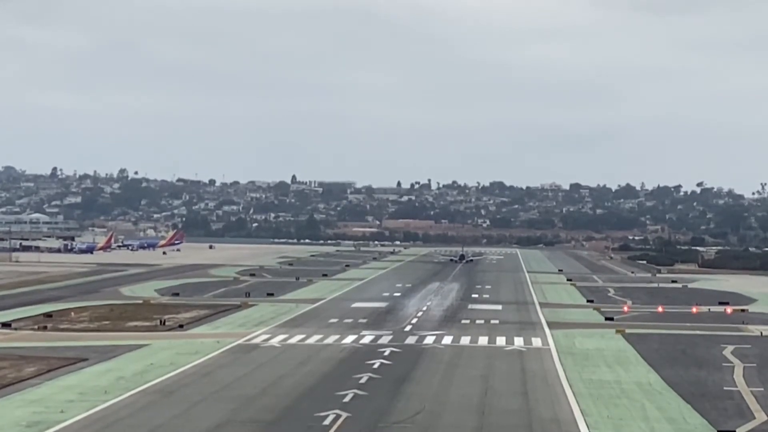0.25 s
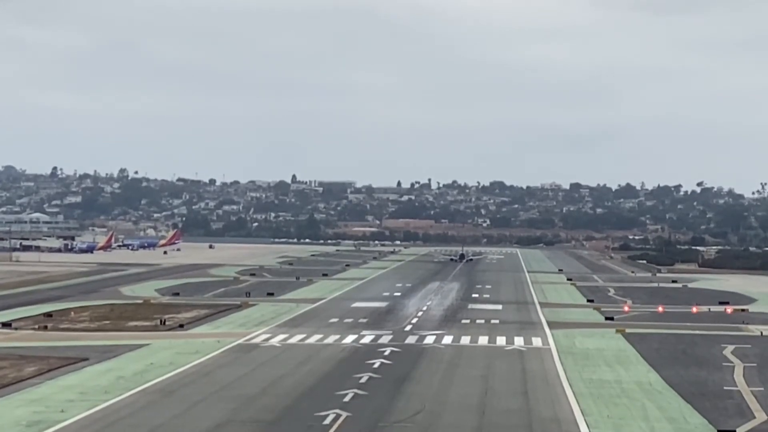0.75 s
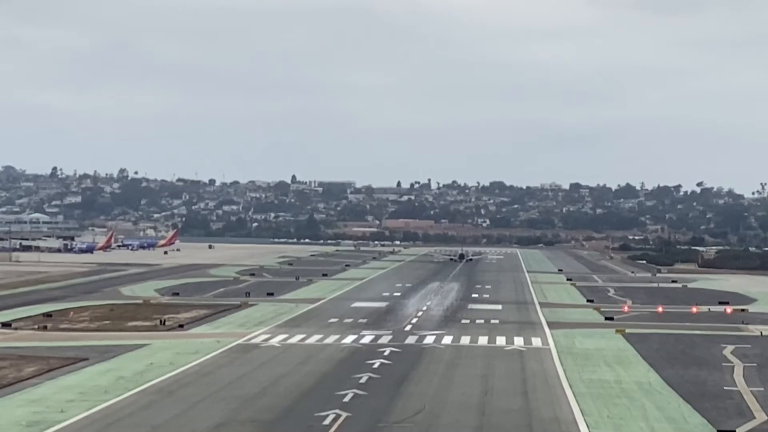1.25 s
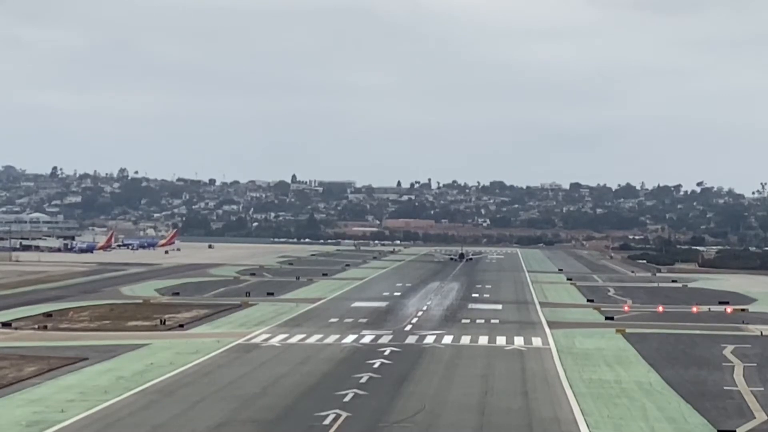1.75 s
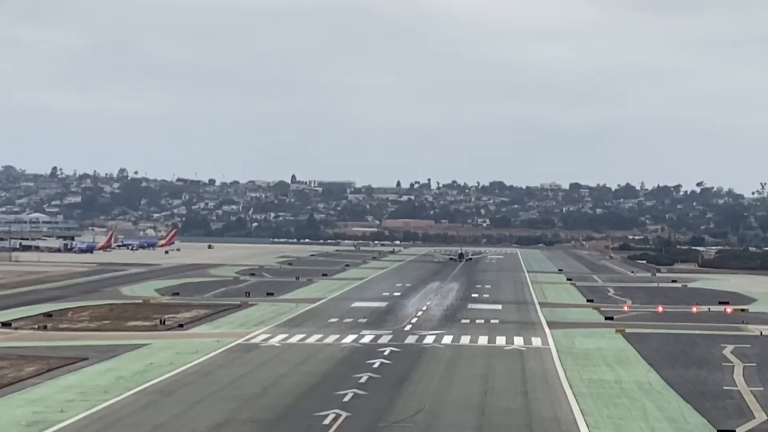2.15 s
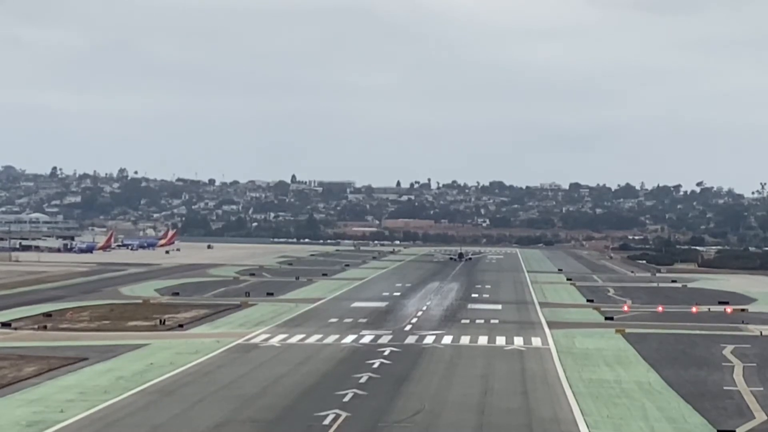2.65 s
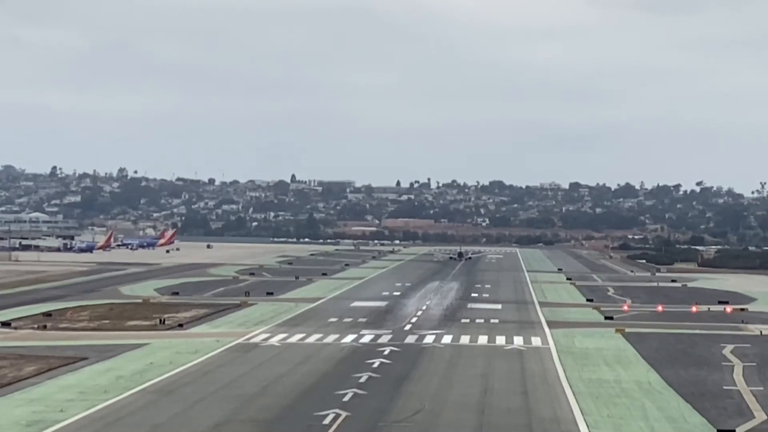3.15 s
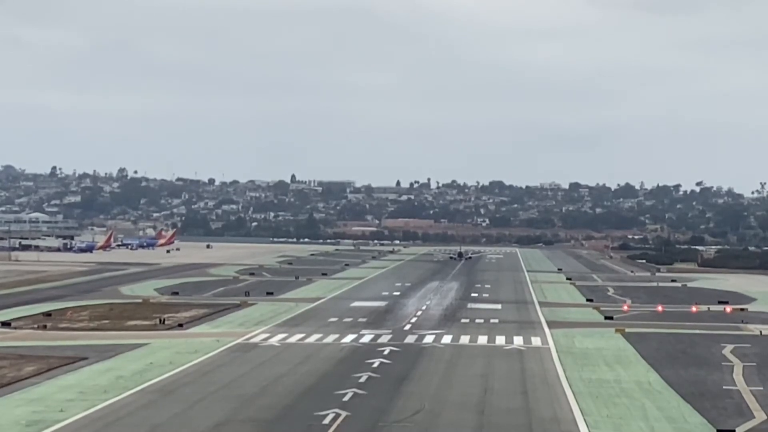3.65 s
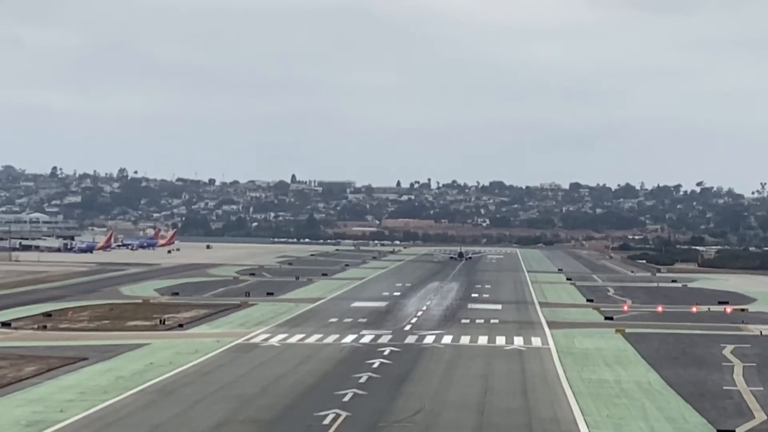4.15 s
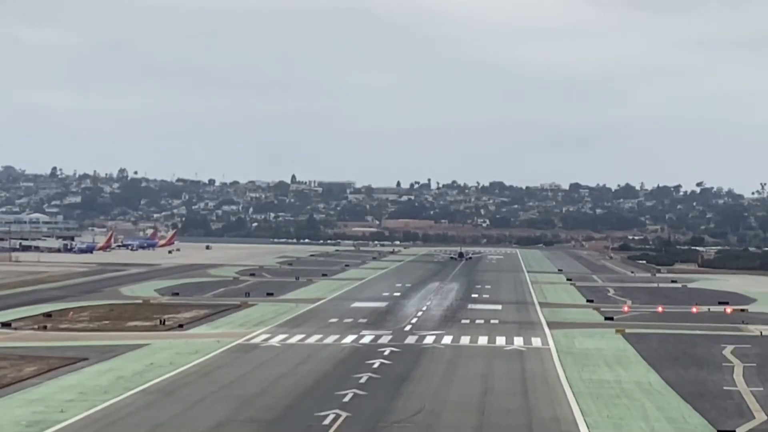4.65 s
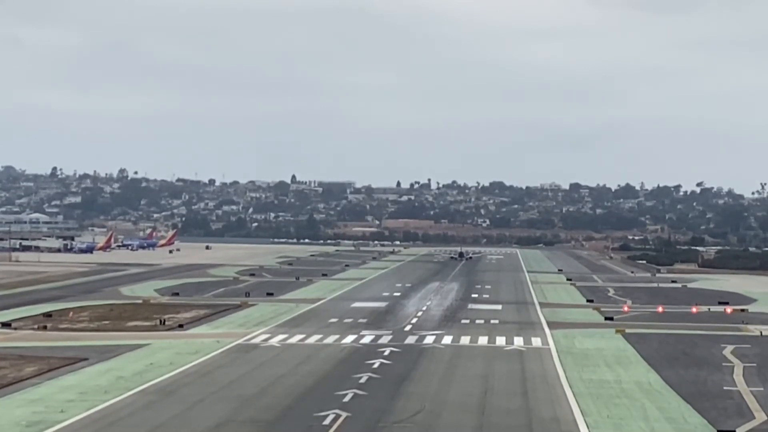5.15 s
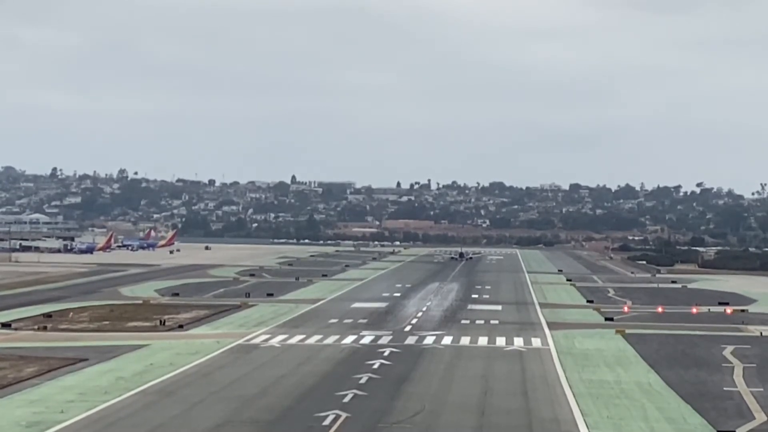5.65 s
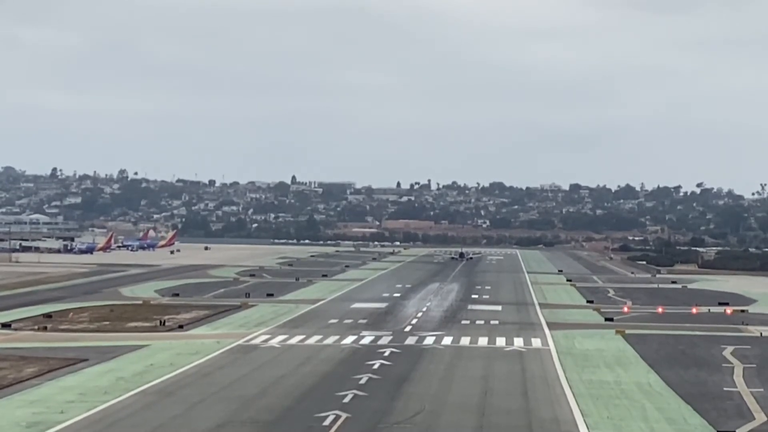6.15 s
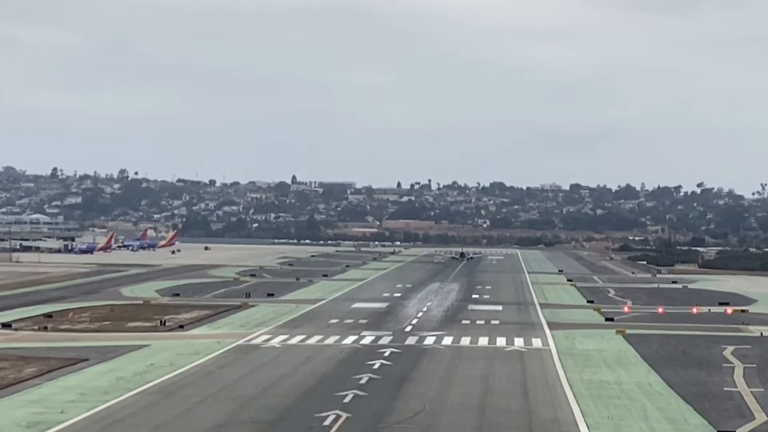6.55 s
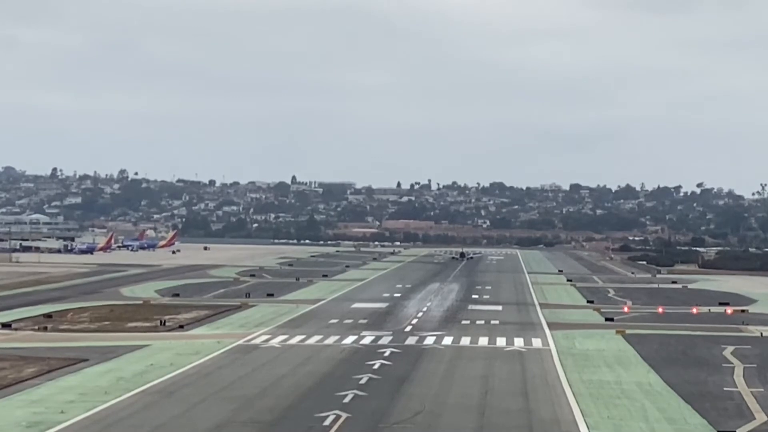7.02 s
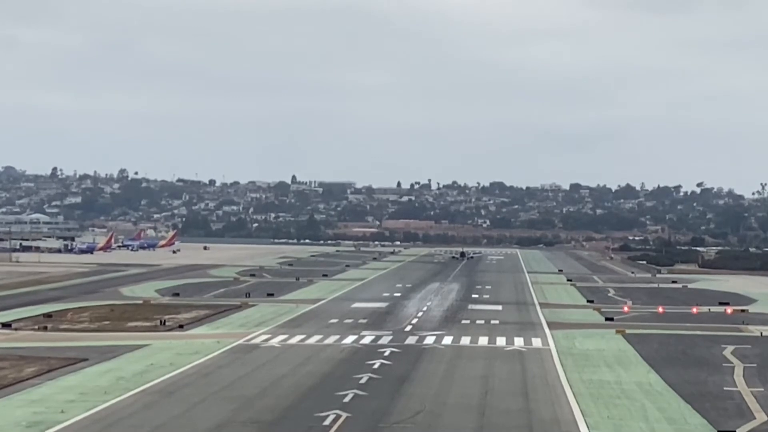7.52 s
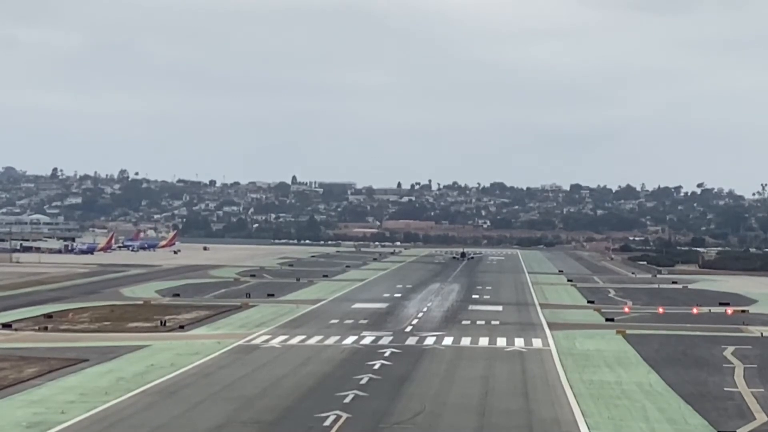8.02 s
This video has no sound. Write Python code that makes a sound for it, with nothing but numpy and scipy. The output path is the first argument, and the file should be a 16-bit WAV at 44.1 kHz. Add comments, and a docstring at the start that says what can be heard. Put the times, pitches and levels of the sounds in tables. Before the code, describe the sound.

A close-spaced stereo microphone in open air picks up far jet rumble and soft hiss. A deep engine drone slides downward, with a knock and light taps close by, then climbs under throttle into a raspy growl. Just past the middle the vehicle whooshes by, its note falling abruptly, and a smoother, wavering drone recedes with soft air hiss and a few handling bumps.

```python
"""Outdoors by a runway, the rumble of distant jets rises and falls under a steady wash of open air.
A few dull thumps and ticks sound close to the microphone while a piston engine (by its beat a V8) coasts down.
It revs up with a hard rasp, sweeps past with a rush of air, drops in pitch and drones away; more thumps follow.
The engine is a sum of orders of its cycle rate plus exhaust bursts; air and jets are coloured noise,
the thumps decaying sines, the ticks tiny bursts of noise."""
import sys
import numpy as np
from scipy import signal
from scipy.fft import rfft, irfft
from scipy.io import wavfile

SR = 44100
rng = np.random.default_rng(int(sys.argv[2]) if len(sys.argv) > 2 else 0)


def inscribe(sig):
    """Save sig as 16-bit PCM at rate SR to the path in sys.argv[1].

    A 1-D sig is mono; a 2-D sig holds one channel per row.
    Samples are clipped to [-1, 1] before scaling.
    """
    pcm = np.round(np.clip(np.atleast_2d(sig).T, -1, 1) * 32767)
    wavfile.write(sys.argv[1], SR, pcm.astype(np.int16))


N = 365130
TIME = np.arange(N) / SR

# How hard the engine works. Each row: time in seconds, throttle 0-1.
THROTTLE = [(0, 0.35), (2.3, 0), (2.58, 0.8), (3.4, 0.99), (4.0, 0.73), (4.18, 0.54), (4.36, 0.91),
            (4.52, 0.65), (4.72, 0.58), (5.45, 0.58), (6.1, 0.52), (8.28, 0.3)]


def gain_of(db):
    """Decibels to amplitude."""
    return 10 ** (np.asarray(db) / 20)


def evened(x):
    """Scales to rms 1."""
    return x / np.sqrt(np.mean(abs(x) ** 2) + 1e-20)


def curves(rows):
    """Each column of a time table, at every sample."""
    s, *columns = np.transpose(rows)
    return [np.interp(TIME, s, column) for column in columns]


def read(points, hz):
    """A spectrum table on a log-frequency axis."""
    f, value = np.transpose(points)
    return np.interp(np.log(hz + 1), np.log(f + 1), value)


def coloured(x, spectrum):
    """Gives x a spectrum, at rms 1."""
    gain = gain_of(read(spectrum, np.fft.rfftfreq(N, 1 / SR)))
    return evened(irfft(rfft(x) * gain, N))


def wander(rate):
    """Smooth chance of about rms 1, changing about rate times a second."""
    points = 4096
    hz = np.fft.rfftfreq(points, TIME[-1] / points)
    slow = irfft(rfft(rng.standard_normal(points)) / (1 + (hz / rate) ** 4))
    return evened(np.interp(TIME, np.linspace(0, TIME[-1], len(slow)), slow))


def noise(spectrum):
    """Coloured noise at two closely spaced microphones; its top treble reaches the left one late."""
    # Each row: frequency in Hz, left-right likeness 0-1.
    likeness = [(30, 0.72), (70, 0.89), (150, 0.85), (300, 0.91), (550, 0.84), (1000, 0.48), (1700, 0.7),
                (2300, 1), (7000, 1), (8500, 0.79), (15000, 0.66)]
    lag_s, lag_from_hz = 0.000295, 7600
    hz = np.fft.rfftfreq(N, 1 / SR)
    same = np.clip(read(likeness, hz), -1, 1)
    mid, side = rfft(rng.standard_normal((2, N))) * np.sqrt([1 + same, 1 - same])
    late = np.exp(-2j * np.pi * hz * lag_s * (hz > lag_from_hz))
    return coloured(irfft([(mid + side) * late, mid - side], N), spectrum)


def nearness(half_s):
    """1 at the closest moment, falling towards 0 before and after; half as much half_s seconds away."""
    closest_s = 5.18
    return 1 / (1 + ((TIME - closest_s) / half_s) ** 2)


def leaving():
    """0 until the engine has gone by and its tail turns to the listener, then rising towards 1."""
    leave_s, takes_hold_s = 5.66, 0.45
    return 1 - np.exp(-np.maximum(TIME - leave_s, 0) / takes_hold_s)


def driven(coast_db, throttle_db, pass_db, leave_db):
    """A layer's level in dB, from the throttle and the way past."""
    throttle, = curves(THROTTLE)
    return coast_db + throttle_db * throttle + pass_db * nearness(half_s=0.2) + leave_db * leaving()


def swell(s, half_s, db):
    """A smooth rise and fall of amplitude around one moment."""
    return gain_of(db) * np.exp(-.5 * ((TIME - s) / half_s) ** 2)


def together(*gains):
    """Amplitude of unrelated noises sounding at once."""
    return np.sqrt(sum(g ** 2 for g in gains))


def partial(turns, scatter, rate, spread):
    """A tone plus its scattered reflections, which fade in and out and differ a little between the ears."""
    common = 1 + scatter * (wander(rate) + 1j * wander(rate))
    apart = spread * (wander(rate) + 1j * wander(rate))
    spin = np.exp(2j * np.pi * (turns + rng.random()))
    return evened((np.array([common + apart, common - apart]) * spin).real)


def drone(turns, speed, trim_db=-0.73, note_trim_db=-0.6, fading_db=-0.5, far_fading_db=5.0, fading_rate=4.4):
    """The deep, clean orders of the exhaust and its main note; they fade in and out more as the engine leaves."""
    # Loudness of the deep orders. Each row: time in seconds, level in dB before the trim.
    drone_level = [(0.0, -33), (0.28, -20), (0.64, -26), (2.03, -18), (2.4, -29), (2.53, -17),
                   (3.23, -17.5), (4.01, -20), (4.12, -27.5), (4.43, -18.5), (4.56, -39), (4.72, -21),
                   (5.14, -16.5), (5.35, -20), (5.48, -24.5), (5.67, -17.5), (6.79, -28.5), (7.76, -23.5),
                   (8.28, -17.5)]
    # Each row: multiple of the cycle rate, relative level in dB, dB added at the pass, dB added once it leaves.
    drone_orders = [(1, -1.5, 4, -15), (2, 3, -6, -0.8), (3, -5, 10, -14), (8, -0.66, 3, -17)]
    # The exhaust's response, which those orders glide through. Each row: frequency in Hz, gain in dB.
    exhaust = [(33.0, -35.5), (50.0, -11), (70.0, -16.5), (90.0, -5.5), (115.0, -0.5), (140.0, 2),
               (175.0, -3.5), (270.0, -31), (320.0, -9.5), (370.0, -8), (400.0, -11.5), (470.0, -19)]
    # The main note. Each row: time in seconds, level in dB before the trim.
    note_level = [(0, -26.5), (.58, -32.5), (1.03, -21.5), (1.9, -24), (2.2, -23), (2.63, -16.5),
                  (4.0, -19.5), (4.27, -31.5), (4.55, -24), (4.8, -33.5), (5.35, -33), (5.5, -21),
                  (6.0, -27.5), (6.8, -31.5), (8.28, -47)]
    note_order = 5
    level_db = curves(drone_level)[0] + trim_db
    levels = [(note_order, curves(note_level)[0] + note_trim_db)]
    for k, db, pass_db, leave_db in drone_orders:
        order = round(k)
        response_db = read(exhaust, order * speed)
        levels.append((order, level_db + driven(db, 0, pass_db, leave_db) + response_db))
    depth_db = fading_db + far_fading_db * leaving()
    out = 0
    for order, db in levels:
        tone = partial(order * turns, scatter=0.26, rate=19.0, spread=0.039)
        out = out + gain_of(db + depth_db * wander(fading_rate)) * tone
    return out


def overtones(turns, speed, trim_db=-6.5, scatter_low=0.17, scatter_per_order=0.022):
    """Weaker orders swell as they glide through the pipe's resonances; the high ones are rougher and need throttle."""
    # Each row: multiple of the cycle rate, relative level in dB.
    orders = [(4, -2.5), (6, 0.5), (7, -1), (9, -5.5), (10, -1.5), (11, -1), (12, -15), (13, -4.5),
              (14, -4), (15, -11.5), (16, -3), (18, -8.5), (19, -5), (21, -9.5), (22, -10), (24, -8.5),
              (26, -12), (27, -10), (30, -10), (32, -13.5)]
    # Exhaust pipe resonances. Each row: centre in Hz, width in Hz, lift in dB coasting, lift in dB at full throttle.
    pipe = [(205.5, 46, 22, 6), (380, 64, 12.5, 9), (437, 25, 0.5, 5.5), (587.5, 34, 12.5, 0),
            (714, 29, 2.5, 1.5), (925, 74, -10, 3.5)]
    # Each row: time in seconds, level in dB before the trim.
    overtone_level = [(0, -46), (.22, -36), (.6, -37), (.8, -47.5), (1.95, -49), (2.2, -39.5), (2.55, -30),
                      (2.95, -31.5), (3.65, -31), (4.15, -38), (4.55, -43), (4.8, -36.5), (5.17, -31.5),
                      (5.38, -42.5), (5.72, -36), (6.1, -46.5), (8.28, -59.5)]
    # off the throttle the treble falls away
    dull_from_hz, dull_db_per_octave = 720, -15.5
    throttle, = curves(THROTTLE)
    out = 0
    for k, db in orders:
        order = round(k)
        order_hz = order * speed
        lift_db = 0
        for hz, width, coast_db, full_db in pipe:
            peak_db = coast_db + (full_db - coast_db) * throttle
            lift_db = lift_db + peak_db / (1 + (2 * (order_hz - hz) / width) ** 2)
        octaves_above = np.maximum(np.log2(order_hz / dull_from_hz), 0)
        dull_db = dull_db_per_octave * (1 - throttle) * octaves_above
        tone = partial(order * turns, scatter=scatter_low + scatter_per_order * order, rate=8.0, spread=0.07)
        out = out + gain_of(db + lift_db + dull_db) * tone
    return gain_of(curves(overtone_level)[0] + trim_db) * out


def echoed(x):
    """A far wall returns the sound late; while the pitch glides, its lines run beside the direct ones."""
    delay_s, wall_db = 0.11, -10
    late = np.array([np.interp(TIME - delay_s, TIME, ear, left=0) for ear in x])
    return x + gain_of(wall_db) * late


def rasp(turns, speed, rough=0.06, puff_s=0.0016, uneven_db=4.0, echo=0.12):
    """Under load the loudest cylinders bark once a cycle: a sharp crack and a puff of gas."""
    # Exhaust bursts within one cycle. Each row: place in the cycle 0-1, relative level in dB.
    bursts = [(0, -1.5), (0.383, -3.5), (0.621, -6)]
    # Colour of the bark. Each row: frequency in Hz, gain in dB.
    rasp_colour = [(250, -34.5), (450, -10.5), (620, -7.5), (790, 3.5), (1000, 2), (1180, 4), (1400, -9),
                   (1620, -20), (1850, -8), (2100, -20.5), (2400, -21.5), (3500, -26), (7000, -61.5),
                   (12000, -80)]
    # Each row: time in seconds, level in dB of the direct bark.
    rasp_level = [(0, -60), (2.2, -58.5), (2.48, -43.5), (2.75, -38.5), (3.15, -35.5), (3.45, -30),
                  (3.72, -32.5), (4.0, -37), (4.2, -38.5), (4.36, -30.5), (4.52, -39), (4.7, -34.5),
                  (5.15, -36), (5.45, -37), (5.8, -48), (6.1, -57.5), (8.28, -45)]
    # the bark loses its regularity as the engine comes close: jitter before and after, moment and span
    early_cycles, late_cycles, change_s, span_s = 0.0044, 0.011, 4.25, 0.1
    closer = (1 + np.tanh((TIME - change_s) / span_s)) / 2
    smear = early_cycles + (late_cycles - early_cycles) * closer
    cracks, puffs = np.zeros(N), np.zeros(N)
    for place, db in bursts:
        cycle = turns - place + smear * wander(11)
        count = np.floor(cycle)
        cracks += np.diff(count, prepend=count[0]) * gain_of(db + uneven_db * wander(27))
        puffs += gain_of(db) * np.exp(-(cycle % 1) / speed / puff_s)
    gas = evened(puffs * noise(rasp_colour))
    direct = evened(coloured(cracks, rasp_colour) + rough * gas) * gain_of(curves(rasp_level)[0])
    # nearby walls return a short scatter, different for each ear
    t = TIME[:SR // 4]
    walls = rng.standard_normal((2, len(t))) * gain_of(-60 * t / 0.56)
    walls = walls / np.linalg.norm(walls[0])
    return direct + echo * signal.fftconvolve(direct, walls, axes=1)[:, :N]


def grounded(x, depth=.5):
    """Adds the ground's reflection; its lag sweeps a comb through the sound as the source goes by."""
    far_ms, pass_ms = 0.18, 4.9  # the lag far off, and what the pass adds to it
    late = TIME - (far_ms + pass_ms * nearness(half_s=0.81)) / 1000
    reflection = np.array([np.interp(late, TIME, ear) for ear in x])
    return (x + depth * reflection) / np.hypot(1, depth)


def flow(turns, throb=0.098, flutter_db=2.0, hiss_trim_db=-1, sizzle_floor_db=-84, sizzle_flicker_db=2.0):
    """Turbulence of exhaust, tyres and air over the open-air wash; roar and rush throb a little with the engine."""
    # Colours of the low roar, rushing air, hiss and sizzle. Each row: frequency in Hz, gain in dB.
    roar_colour = [(30, -33), (60, -11.5), (125, -7.5), (200, -2), (330, 1), (500, -6.5), (750, -11.5),
                   (1200, -16.5), (2500, -30.5), (6000, -65.5)]
    rush_colour = [(200, -28.5), (600, -1.5), (900, 3), (1200, 3), (1550, 0.5), (1900, 0), (2500, -2),
                   (3300, -7), (5000, -17), (7000, -26), (9000, -27), (15000, -62)]
    hiss_colour = [(1500, -26), (3500, -3), (5200, -1.5), (7000, -7), (8500, -12.5), (10000, -18),
                   (12000, -19.5), (14000, -20.5), (16000, -29)]
    sizzle_colour = [(4000, -45.5), (7500, -3.5), (10000, 3), (12000, -10), (14000, -9.5), (16000, -11.5)]
    # Each row: time in seconds, mean level of the roar in dB.
    roar_level = [(0, -35.5), (.65, -32), (1.2, -31), (1.7, -33), (2.3, -35), (3.5, -28), (4.8, -31.5),
                  (5.17, -26), (5.75, -26), (6.2, -34), (7.4, -43.5), (8.28, -38)]
    # Rushing air: level in dB coasting, dB added by full throttle, dB added at the pass, dB added once it leaves.
    rush_db = (-60, 23, 12, -3.5)
    # Air as the body sweeps past. Each row: middle in seconds, half-length in seconds, level in dB.
    gusts = [(5.11, 0.064, -33.5), (5.199, 0.032, -30), (5.427, 0.06, -38.5), (5.59, 0.22, -36)]
    # Each row: middle in seconds, half-length in seconds, hiss level in dB before the trim, sizzle level in dB.
    hiss_swells = [(0.37, 0.091, -49, -65), (0.533, 0.14, -50.5, -54.5), (0.89, 0.22, -56.5, -64),
                   (1.537, 0.15, -53.5, -71), (2.094, 0.28, -58.5, -76), (3.15, 0.47, -46.5, -70.5),
                   (3.99, 0.1, -48.5, -69), (4.37, 0.17, -53, -70), (5.338, 0.049, -48.5, -49.5),
                   (5.553, 0.23, -52, -60)]
    wash_db, hiss_db, hiss_leave_db = -46.5, -57.5, -2.5  # open air, its hiss, the hiss's change once it leaves
    rush = together(gain_of(wash_db), gain_of(driven(*rush_db)), *(swell(*row) for row in gusts))
    hiss_rises = [swell(s, half_s, db + hiss_trim_db) for s, half_s, db, _ in hiss_swells]
    hiss = together(gain_of(hiss_db + hiss_leave_db * leaving()), *hiss_rises)
    sizzle_rises = [swell(s, half_s, db) for s, half_s, _, db in hiss_swells]
    sizzle = together(gain_of(sizzle_floor_db), *sizzle_rises)
    beat = 1 + throb * np.cos(2 * np.pi * turns)
    low = gain_of(curves(roar_level)[0] + flutter_db * wander(6.9)) * noise(roar_colour)
    middle = rush * gain_of(.5 * wander(14.0)) * grounded(noise(rush_colour), depth=0.12)
    top = sizzle * gain_of(sizzle_flicker_db * wander(55)) * noise(sizzle_colour)
    return beat * (low + middle) + hiss * noise(hiss_colour) + top


def streaks(width_hz=170, flutter_db=1.0):
    """Narrow bands of air noise that swell and glide, mostly down in pitch, around the pass."""
    # Each row: middle in seconds, half-length in seconds, pitch in Hz, glide in Hz per second, level in dB.
    streak_rows = [(3.599, 0.092, 2360, 201, -47.5), (3.92, 0.16, 1840, 2.5, -44.5),
                   (4.354, 0.087, 2030, -1, -44), (4.8, 0.27, 1920, -200, -48),
                   (5.111, 0.16, 1237, -900, -36.5), (5.19, 0.11, 1790, -300, -37.5),
                   (5.37, 0.051, 1840, -900, -38), (5.425, 0.014, 2210, -10, -37),
                   (5.386, 0.048, 820, -600, -33.5), (5.574, 0.08, 2100, -900, -40),
                   (5.547, 0.041, 1363, -2400, -37), (5.619, 0.21, 471.5, -300, -35.5)]
    out = 0
    for s, half_s, hz, hz_per_s, db in streak_rows:
        turns = np.cumsum(hz + hz_per_s * (TIME - s)) / SR
        band = (wander(width_hz) + 1j * wander(width_hz)) * np.exp(2j * np.pi * turns)
        out = out + swell(s, half_s, db) * evened(band.real)
    return out * gain_of(flutter_db * wander(5.2))


def far_hiss(level_db=-58):
    """A broad, soft hiss that comes up and lingers once the engine has gone by."""
    # Each row: frequency in Hz, gain in dB.
    far_colour = [(1200, -24), (1800, 6), (2400, 3.5), (3000, -4), (4500, -45)]
    return gain_of(level_db) * leaving() * noise(far_colour)


def thumps():
    """Dull pushes close to the microphone: short sines, each under a quick rise and decay."""
    # Each row: start in seconds, level in dB, pitch in Hz, time to the envelope's peak in seconds.
    thump_rows = [(0.693, -7.5, 327, 0.00099), (0.707, -9, 92, 0.0054), (6.031, -13, 72, 0.015),
                  (7.694, -11.5, 121, 0.0034), (7.795, -11, 83.5, 0.0049), (7.89, -17.5, 203, 0.0026)]
    out = np.zeros(N)
    for s, db, hz, rise in thump_rows:
        age = np.maximum(TIME - s, 0)
        envelope = age / rise * np.exp(1 - age / rise)
        out += gain_of(db) * envelope * np.sin(2 * np.pi * hz * age)
    return out


def ticks(corner_hz=550):
    """Tiny bursts of noise close to the microphone: a short bright one, and longer, duller taps."""
    # Each row: middle in seconds, level in dB, treble slope in dB per octave, rise and decay constant in seconds.
    tick_rows = [(1.023, -24.5, -7.5, 0.0019), (1.575, -26, -9.5, 0.0027), (1.754, -28, -8.5, 0.0033)]
    out = 0
    for s, db, slope_db, decay_s in tick_rows:
        slope = [(corner_hz * 2 ** octave, slope_db * octave) for octave in range(5)]
        colour = [(150, -6)] + slope + [(12000, -55)]
        out = out + gain_of(db) * np.exp(-abs(TIME - s) / decay_s) * noise(colour)
    return out


def distant_jets():
    """Low coloured noise far off, slowly rising and falling."""
    # Each row: time in seconds, level in dB.
    rumble_level = [(0, -19.5), (2.2, -26.5), (3.2, -34), (4.2, -22.5), (5.3, -33), (6.7, -32), (7.6, -29),
                    (8.28, -33.5)]
    # Each row: frequency in Hz, gain in dB.
    rumble_colour = [(15, -42), (28, -21.5), (38, -8.5), (50, -2), (85, -4), (130, -3), (200, -10),
                     (350, -21), (800, -27), (3000, -75.5)]
    return gain_of(curves(rumble_level)[0]) * noise(rumble_colour)


def scene():
    """The passing engine, its air, the small knocks and the far rumble."""
    # Engine cycles as heard, Doppler shift included. Each row: time in seconds, cycles per second.
    cycle_rate = [(0.0, 46.3), (0.35, 45.9), (0.75, 43.0), (1.05, 40.0), (1.35, 37.3), (1.8, 34.3),
                  (2.1, 33.3), (2.22, 35.3), (2.31, 33.2), (2.47, 33.9), (2.85, 37.4), (3.3, 42.3),
                  (3.87, 48.3), (4.03, 48.4), (4.32, 52.6), (4.5, 51.7), (4.7, 53.0), (5.14, 58.3),
                  (5.24, 58.6), (5.39, 54.5), (5.51, 46.0), (5.78, 47.0), (6.6, 47.35), (7.05, 46.1),
                  (7.85, 42.8), (8.28, 41.4)]
    speed, = curves(cycle_rate)
    turns = np.cumsum(speed * (1 + 0.0018 * wander(9.3))) / SR  # slightly uneven running
    bark = grounded(rasp(turns, speed), depth=0.55)
    engine = drone(turns, speed) + echoed(overtones(turns, speed)) + bark
    air = flow(turns) + streaks() + far_hiss()
    balance = gain_of([[-.1], [.1]])  # left, right
    return (engine + air + thumps() + ticks() + distant_jets()) * balance


def record(dry):
    """The recorder's band limit, with a soft start and stop."""
    edge_hz, fade_s = 15300, 0.004
    fade = np.minimum(np.minimum(TIME, TIME[-1] - TIME) / fade_s, 1)
    lowpass = signal.firwin(511, edge_hz, window=("kaiser", 9), fs=SR)
    return signal.oaconvolve(dry * fade, lowpass[None], "same")


dry = scene()
out = record(dry)
inscribe(out)
```